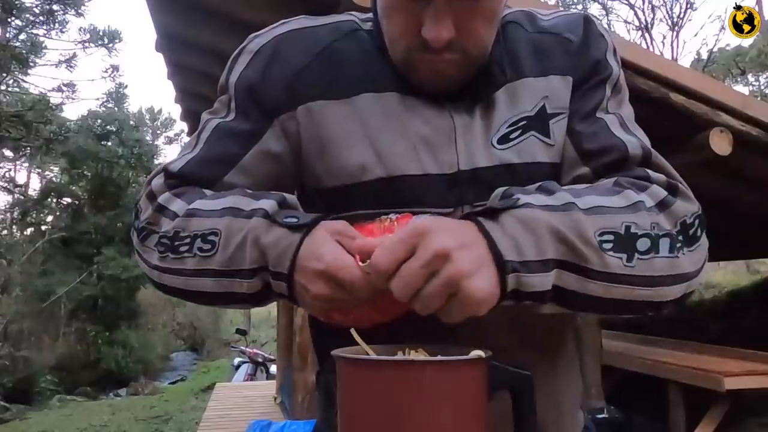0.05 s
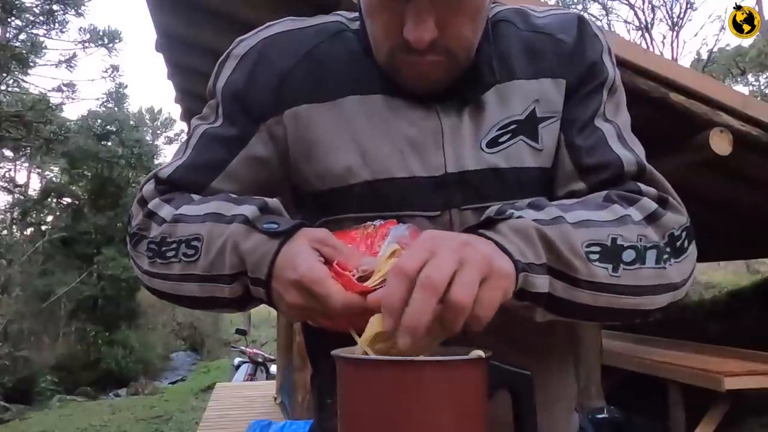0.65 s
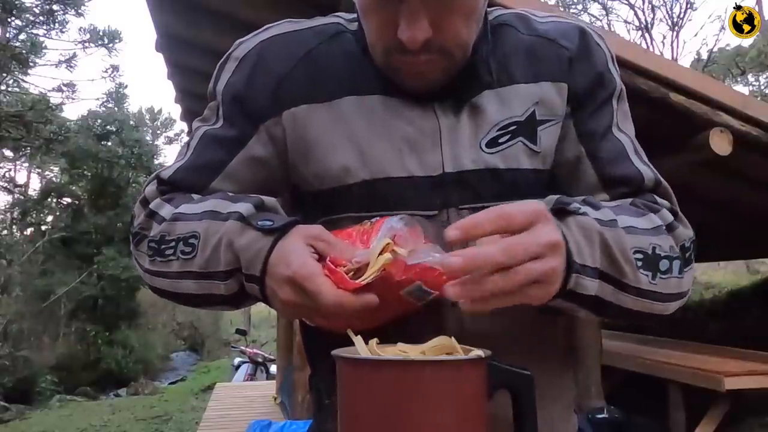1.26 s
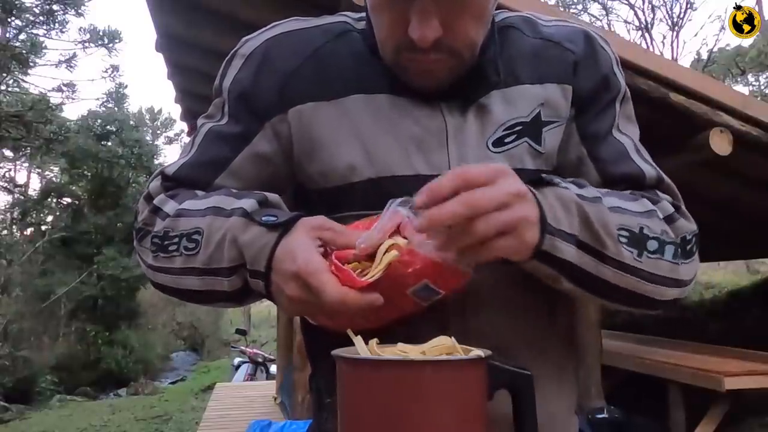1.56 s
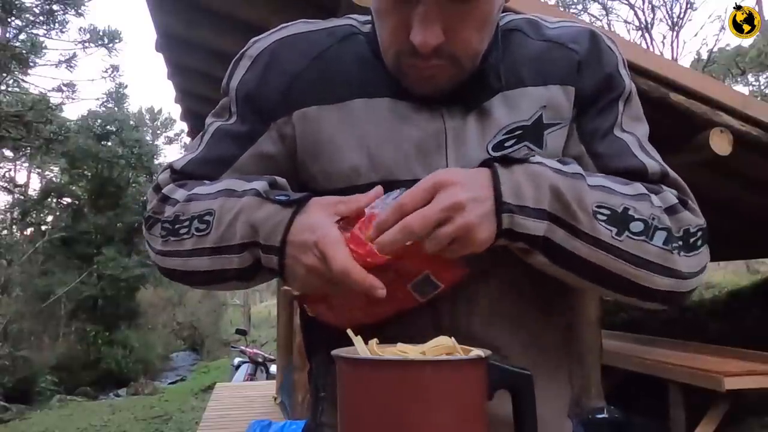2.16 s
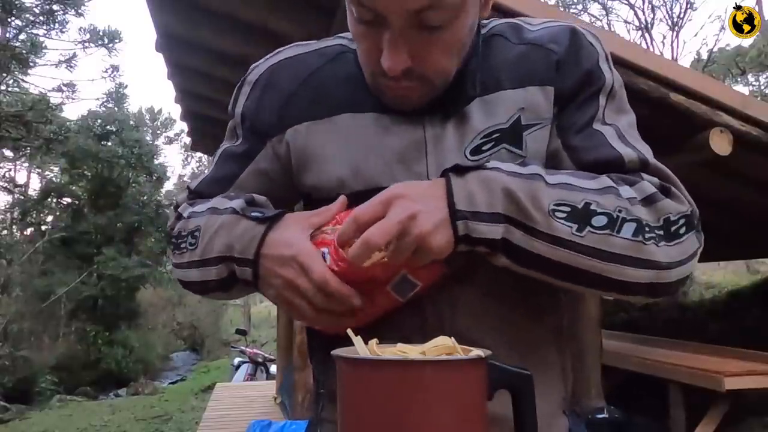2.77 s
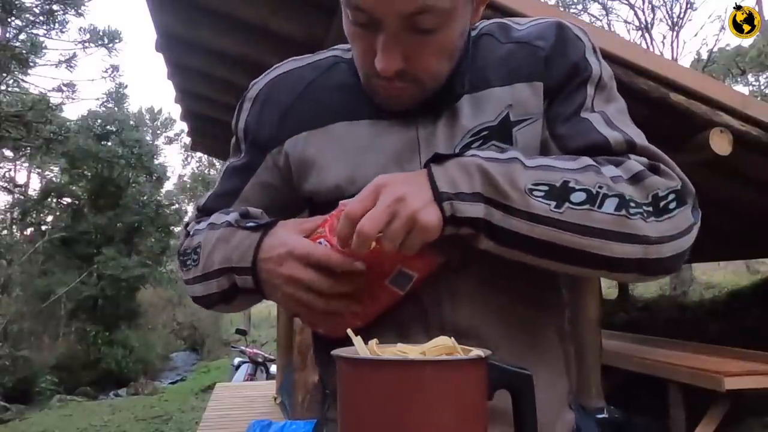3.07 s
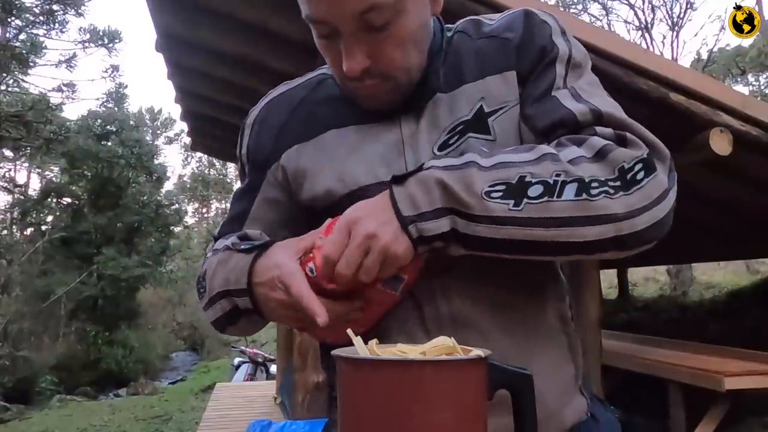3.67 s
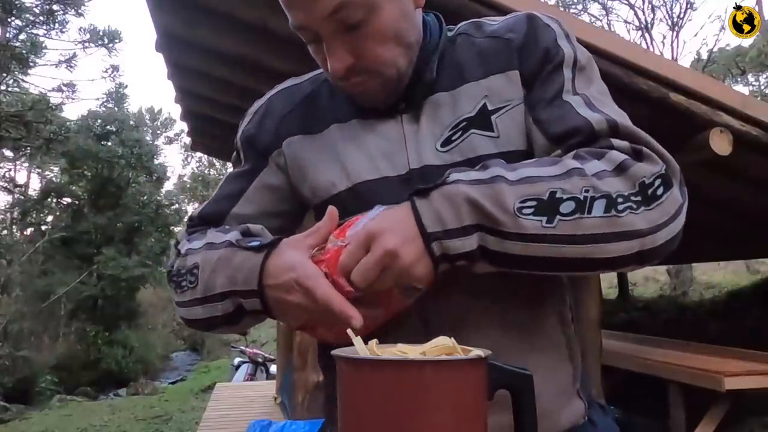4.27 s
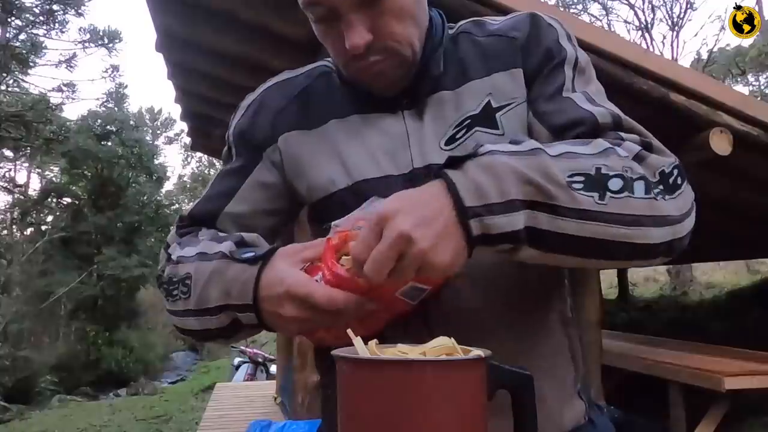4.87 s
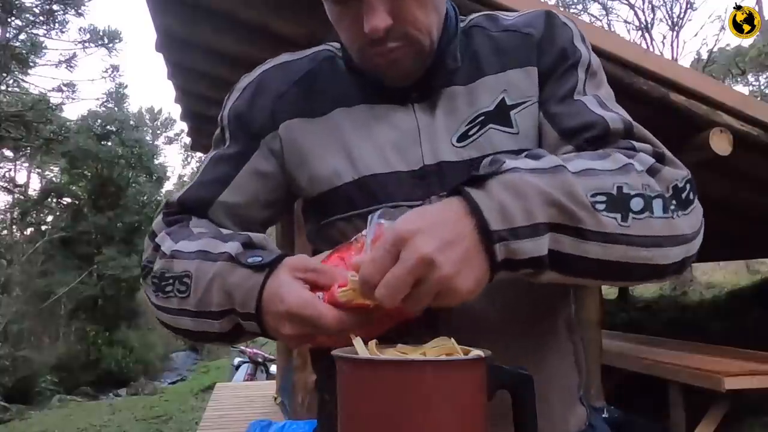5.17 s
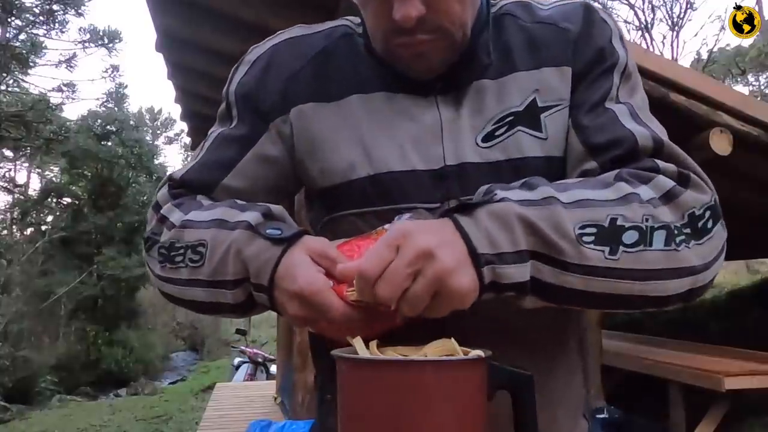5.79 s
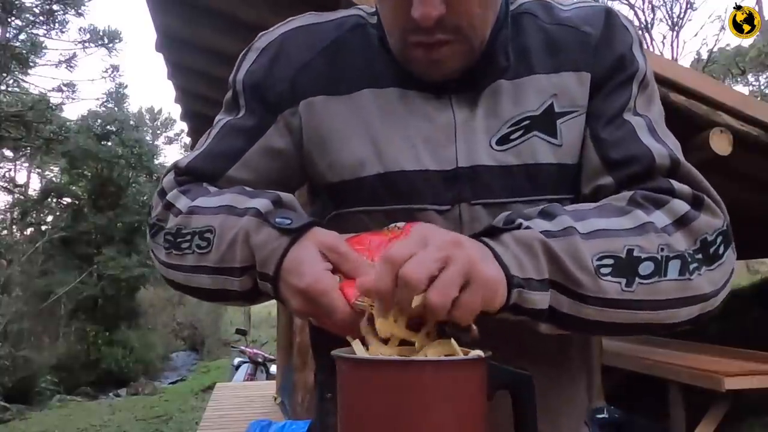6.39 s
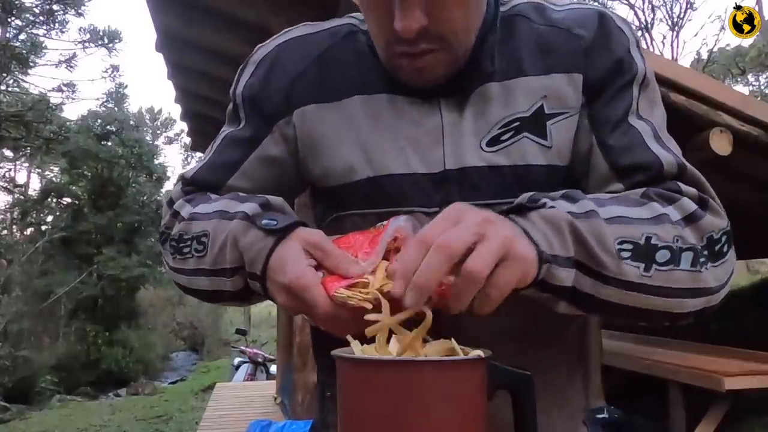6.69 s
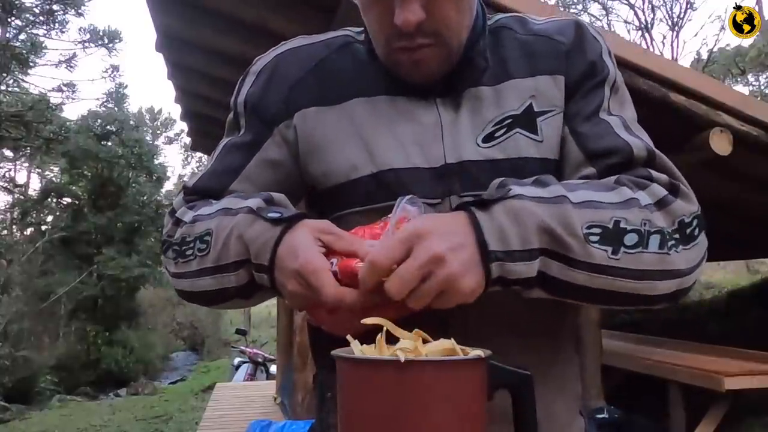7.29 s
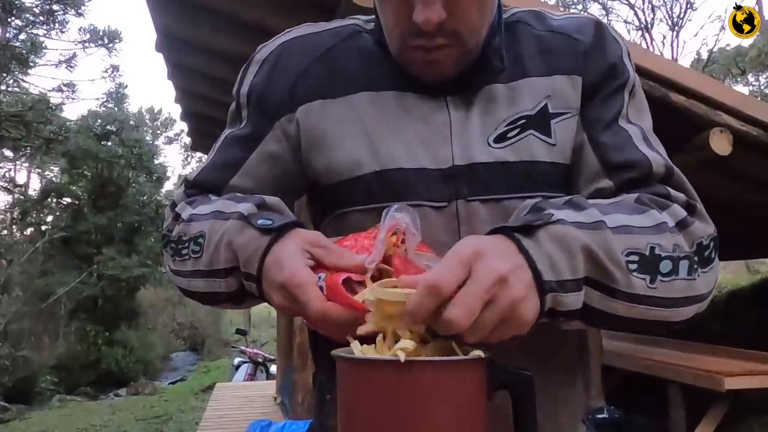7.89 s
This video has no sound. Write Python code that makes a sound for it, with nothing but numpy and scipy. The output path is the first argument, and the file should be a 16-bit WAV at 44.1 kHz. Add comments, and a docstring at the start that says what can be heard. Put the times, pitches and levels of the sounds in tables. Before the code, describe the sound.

A creek rushes steadily throughout, some way off and mostly to the left, in an open outdoor space. Close to a small stereo microphone, hands handle a thin plastic packet of dry ribbon noodles. Light crinkles and ticks come in the first half second, then thin out. From about 1.5 seconds the noodles scrape together, and from 2.2 to 5.4 seconds repeated grips make dense crinkling, grating and small dry cracks, with a few soft, dull bumps of the packet. Between about 5.8 and 6.3 seconds the noodles are broken over a pot in a quick run of sharp, brittle snaps, the loudest sounds. Only a few faint ticks follow until another short spell of crinkling and soft bumps from 7.5 to 7.8 seconds. Jacket sleeves stir a very faint low rumble now and then. The handling sounds dry and near, with almost no echo.

```python
"""Dry noodles, packet to pot

Outdoors, hands work dry ribbon noodles out of a thin plastic packet and snap them over a pot.
Right in front of a small stereo microphone the film crinkles and the noodles grate and crack with
each grip. Now and then the packet is bumped, and jacket sleeves stir a faint rumble.
A creek rushes steadily further off to the left."""
import sys
import numpy as np
from scipy import signal
from scipy.fft import rfft, irfft
from scipy.io import wavfile
from scipy.ndimage import uniform_filter1d, map_coordinates

SR = 44100
rng = np.random.default_rng(int(sys.argv[2]) if len(sys.argv) > 2 else 0)


def dump_mix(stems):
    """Bounce the given channels to the path in sys.argv[1] as a 16-bit WAV at rate SR."""
    frames = np.atleast_2d(stems).T  # one column per channel
    limited = np.clip(frames, -1, 1)  # hard clip at full scale
    pcm = np.round(limited * 32767).astype(np.int16)
    wavfile.write(sys.argv[1], SR, pcm)


N = 350154

# Hands squeeze the packet or dig into it: start_s, length_s, level_db, noodles_over_film_db
HAND_GRIPS = [(0.172, 0.11, -37, -21), (0.3, 0.028, -36.5, -20), (0.41, 0.032, -46, -15),
              (0.758, 0.054, -42, -13), (1.154, 0.058, -43, 3), (1.524, 0.2, -43, 8),
              (1.758, 0.21, -37, 15), (2.059, 0.022, -34, -6), (2.243, 0.174, -32, 0),
              (2.513, 0.18, -31.5, -1), (2.778, 0.2, -32, -2), (3.009, 0.13, -31.5, 2.5),
              (3.284, 0.29, -33.5, 3), (3.515, 0.21, -32, 2.5), (3.726, 0.23, -30.5, -4),
              (3.966, 0.041, -34, -4), (4.186, 0.042, -29.5, 4.5), (4.41, 0.062, -32.5, 3.5),
              (4.505, 0.1, -31, 0), (4.601, 0.25, -30.5, 4), (4.693, 0.11, -29.5, 6.5),
              (4.921, 0.13, -25.5, 1.5), (5.056, 0.17, -34, 0.5), (5.23, 0.097, -38, 4.5),
              (5.376, 0.03, -34, 3), (5.575, 0.059, -34, 9), (5.68, 0.09, -35, -8),
              (5.986, 0.033, -35.5, 7), (7.469, 0.24, -36.5, -3.5), (7.736, 0.074, -33, -4.5)]


def handling(held_db=-50, attack_s=0.036, sag_db_per_s=13, release_s=0.04, settle_db=-9, settle_s=0.23):
    """Each grip swells, sags and lets go, and the film settles. Gives crinkle and grating envelopes."""
    t = np.arange(N) / SR
    film = noodles = np.full(N, from_db(held_db) ** 2 / 2)
    for start_s, length_s, level_db, digging_db in HAND_GRIPS:
        held_s = np.clip(t - start_s, 0, length_s)
        let_go_s = np.clip(t - start_s - length_s, 0, 2)
        attack = np.clip((t - start_s) / attack_s, 0, 1)
        pressure = attack * from_db(level_db - sag_db_per_s * held_s)
        release = np.exp(-2 * let_go_s / release_s)
        settling = from_db(settle_db) ** 2 * np.exp(-2 * let_go_s / settle_s)
        power = pressure ** 2 * (release + settling)
        film_share = 1 / (1 + from_db(digging_db) ** 2)
        film = film + film_share * power
        noodles = noodles + (1 - film_share) * power
    unsteady_fingers = from_db(drift(22))
    return np.sqrt([film, noodles]) * unsteady_fingers


def crackle(spectrum, per_s, spread_db, clump_db, q, facets=14):
    """Tiny clicks come in clumps, each ringing facets of its own pitch. Stereo, level held near 1."""
    size_db = spread_db * np.minimum(rng.exponential(1, N), 3.5) + clump_db * drift(260)
    sizes = from_db(size_db) * rng.choice([-1, 1], N)
    fires = rng.random(N) < per_s / SR
    clicks = sizes * fires * (1 + 0.077 * rng.standard_normal((2, N)))   # slightly unlike in each ear
    facet = np.round(facets * drift(90) + 2 * rng.standard_normal(N)) % facets
    rings = sum(resonance(clicks * (facet == k), hz, q) / np.sqrt(hz / 3000)
                for k, hz in enumerate(np.geomspace(800, 11000, facets)))
    sound = coloured(rings + 0.38 * clicks, spectrum)
    power = np.mean(sound ** 2, axis=0)
    power = uniform_filter1d(uniform_filter1d(power, size=1500), size=1500)
    return sound / np.sqrt(np.abs(power) + 0.0071 * power.mean())


# Bright tone of the buckling film: frequency_hz, gain_db
FILM_EQ = [(100, -31), (300, 3), (650, -11), (1100, -3), (2200, 2), (4000, 1), (7000, -4.5), (11000, -9),
           (16000, -27)]
# Darker tone of noodles rubbing together: frequency_hz, gain_db
GRATING_EQ = [(80, -42), (250, -0.5), (380, -5), (520, -14), (800, -18.5), (1050, -3.5), (1280, -1.5),
              (1600, -5.5), (2200, -7), (3500, -9.5), (7000, -14.5), (16000, -28)]


def packet(crinkle, grating, film_lift_db=2.0):
    """The film buckles and the noodles scrape; harder handling makes both denser and louder."""
    grip = np.hypot(crinkle, grating)
    effort = np.sqrt(grip / grip.max())
    film = crackle(FILM_EQ, per_s=2300 * effort, spread_db=3.5, clump_db=6.0, q=2.8)
    noodles = crackle(GRATING_EQ, per_s=3200 * effort, spread_db=4.0, clump_db=4.5, q=3.7)
    return from_db(film_lift_db) * crinkle * film + grating * noodles


def fracture(centre_hz, rings, length_s, spectrum, tail_s, size=1024):
    """A break sets off a volley of smaller ones that excite rings (hz, db, q). Rms 1 over 5 ms."""
    t = np.arange(size) / SR
    noise, scatter = rng.standard_normal(size), rng.standard_normal((2, size))
    breaks = rms_one(np.sign(noise) * np.abs(noise) ** 1.4)   # spikier than plain noise
    first_break = 0.5 * np.exp(-t / 0.0003)
    volley = np.exp(-(t / (1.96 * max(length_s, 3e-4))) ** 3)
    tail = 0.5 * from_db(-13) * np.exp(-t / tail_s)
    force = evened(breaks * (volley + first_break + tail))
    force = force + scatter * (0.3 * volley + tail)   # scattered by pot and jacket
    crack = rms_one(coloured(resonance(force, centre_hz, q=0.62), spectrum, size=512))
    sound = crack + sum(from_db(db) * rms_one(resonance(crack, hz, q)) for hz, db, q in rings)
    return sound / np.sqrt(np.sum(sound ** 2) / (2 * 0.005 * SR))


def evened(burst, amount=0.6):
    """Smooth a burst's chance peaks and dips, so a crack takes its colour from the piece that breaks."""
    hz = np.fft.rfftfreq(len(burst), 1 / SR)
    power = uniform_filter1d(np.abs(rfft(burst)) ** 2, size=9)
    excess_db = 10 * np.log10(power / power.mean() + 0.1)
    return coloured(burst, np.transpose([hz, -amount * excess_db])[1:], size=256)


# Cracks that stand out of the crinkle: start_s, level_db (before lift), centre_hz, ring_hz, ring_db
ACCENT_CRACKS = [(0.1227, -26, 3700, 3120, 0), (0.1898, -29, 7000, 1130, -4),
                 (0.2238, -26, 7060, 7700, -7.5), (0.2572, -28.5, 4500, 2885, -3),
                 (0.289, -28.5, 3750, 2720, -5), (0.3293, -28.5, 6200, 2800, -11),
                 (0.3334, -28, 3700, 2920, -10), (0.3384, -26, 3640, 3270, -4),
                 (0.4403, -28.5, 2980, 1920, -18), (1.1969, -28.5, 3600, 3900, -6),
                 (1.537, -34, 2970, 3540, 2), (1.615, -29.5, 5540, 2740, -9),
                 (1.6994, -27.5, 3270, 2220, -8), (1.8018, -30, 1200, 4030, 4),
                 (1.824, -24.5, 1890, 4130, -2), (2.2294, -29.5, 3100, 7050, -12),
                 (2.2367, -21, 2660, 3410, -6), (2.3262, -19.5, 3760, 5780, -8),
                 (2.3955, -27, 1420, 3480, -8.5), (2.4115, -23, 4510, 3180, -5.5),
                 (2.5797, -25.5, 1900, 2920, -8), (2.591, -25, 4450, 3400, -15),
                 (2.6025, -20, 3000, 4050, -5.5), (2.6448, -19, 4500, 2180, -2),
                 (2.652, -23.5, 3700, 2700, -10), (2.6812, -22.5, 2370, 7400, -14),
                 (2.7332, -27.5, 4500, 1980, -14), (2.7584, -24, 3670, 3600, -4),
                 (2.8155, -27, 7060, 7000, 3), (2.8564, -24.5, 4480, 2030, -5),
                 (2.8645, -22, 3660, 4010, -1), (2.8927, -20.5, 7000, 6130, 7),
                 (2.9044, -26, 1900, 2940, 6), (2.9194, -24.5, 1200, 2130, -10),
                 (3.0195, -25.5, 2990, 3600, 0), (3.0339, -22.5, 1500, 2070, 0),
                 (3.052, -27, 3000, 3860, 4), (3.0607, -24, 7100, 5480, 16),
                 (3.1562, -24.0, 2360, 1380, -3), (3.3005, -19, 2830, 4680, 2),
                 (3.3239, -31, 2750, 1240, -2), (3.3345, -20, 1495, 2077, -6),
                 (3.4076, -26, 2630, 4140, -7), (3.4143, -19.5, 3680, 1245, -6),
                 (3.4622, -23, 3700, 2570, -1), (3.4769, -23, 3000, 1520, -5),
                 (3.4932, -25.5, 3000, 5300, -19), (3.5655, -21, 2630, 1335, -1),
                 (3.5703, -23.5, 4000, 5000, -10), (3.5745, -18.5, 3300, 1410, -8),
                 (3.5904, -18.5, 1800, 5600, 0), (3.604, -25, 2190, 1250, 9), (3.6256, -24, 1200, 2380, -3),
                 (3.6354, -21, 2400, 2630, -4.5), (3.694, -27.5, 2200, 2500, -7),
                 (3.8083, -23.5, 4470, 7480, -1), (3.8226, -27.5, 2500, 3400, 0.5),
                 (3.8524, -26, 4970, 3510, 2), (3.8598, -24.5, 3000, 3600, -4.5),
                 (3.8898, -27, 1800, 5070, -7), (3.9042, -28, 4500, 4800, -5),
                 (3.9239, -23, 3050, 1860, -2), (3.9841, -28, 7300, 4560, -10),
                 (3.9898, -28.5, 3700, 3600, -9), (4.0304, -26.5, 1880, 4150, -2),
                 (4.1724, -21.5, 3290, 1350, -8.5), (4.174, -25.5, 5500, 2000, 1.5),
                 (4.2233, -29, 1100, 2140, 1), (4.2356, -23, 5520, 1730, 4), (4.2526, -23, 5500, 5230, -5),
                 (4.3041, -24.5, 4500, 1080, -8), (4.423, -26.0, 1210, 2450, 9),
                 (4.4339, -23, 3020, 3830, -4.5), (4.4724, -23.5, 2390, 1316, -8),
                 (4.5675, -22, 2410, 4700, 0), (4.5867, -22.5, 1900, 1925, -10),
                 (4.7441, -22.5, 1495, 2210, -6), (4.7886, -22.5, 1923, 1934, -8),
                 (4.8638, -23.5, 1200, 8110, 4), (4.9203, -24.5, 1207, 2860, 3.5),
                 (4.971, -23, 1920, 1360, 7), (4.9984, -24, 1207, 1388, 8), (5.0701, -31, 3190, 3120, 5.5),
                 (5.1227, -20, 6770, 2800, -5), (5.3004, -21, 3700, 1324, -2.5),
                 (5.315, -22.5, 3000, 1100, -6), (5.3464, -26, 1510, 6430, -9),
                 (5.6009, -26.5, 1203, 1270, -6), (5.7098, -28.5, 1250, 3670, -11),
                 (5.7527, -25, 7000, 2990, -2), (5.7945, -26.5, 2360, 3120, -5),
                 (6.3831, -29.5, 5430, 6500, -5), (6.6287, -28.5, 3000, 5970, -2),
                 (6.6615, -31.5, 5530, 3270, -2), (6.993, -32, 4500, 3300, -5),
                 (7.4985, -31, 6500, 3780, -8), (7.5482, -28, 3520, 1850, 0.5),
                 (7.5593, -26, 5000, 1860, -8), (7.7218, -26, 3280, 980, -9.5),
                 (7.7243, -23, 3200, 3320, -2.5), (7.7875, -27, 1896, 2060, 3)]
# Tone of a crack inside the packet: frequency_hz, gain_db
CRACK_EQ = [(100, -34), (400, 0), (750, -6), (1150, 8), (1600, 1.5), (2200, 4), (3200, -0.5), (5500, 2),
            (9000, -3.5), (16000, -8)]


def cracks(rows, lift_db=0.0, usual_length_s=0.0012, ring_q=9.4):
    """Creases flip and noodles give way: dry ticks, each with a ping ring_db above its crack."""
    out = np.zeros((2, N))
    for start_s, level_db, centre_hz, ring_hz, ring_db in rows:
        length_s = usual_length_s * np.exp(0.31 * rng.standard_normal())
        crack = fracture(centre_hz, [(ring_hz, ring_db, ring_q)], length_s, CRACK_EQ, tail_s=0.0027)
        add(out, start_s, from_db(level_db + lift_db) * crack)
    return out


def lesser_ticks(crinkle, grating, peak_per_s=85, film_hz=4800, noodle_hz=1800, ring_db=-15, count=800):
    """Creases and noodles give way at random, more often and louder as the film is squeezed."""
    when, chance = rng.random((2, count))
    spread_db, detune = np.clip(rng.standard_normal((2, count)), -2, 2)
    at = (when * N).astype(int)
    grip = np.hypot(crinkle, grating)[at]
    film_share = (crinkle[at] / grip) ** 2
    centre_hz = noodle_hz * (film_hz / noodle_hz) ** film_share
    ring_hz = centre_hz * 2 ** (0.27 * detune)
    level_db = 20 * np.log10(grip) - 0.5 + spread_db
    rows = np.transpose([at / SR, level_db, centre_hz, ring_hz, np.full(count, ring_db)])
    odds = peak_per_s * N / SR / count * crinkle[at] / crinkle.max()
    return cracks(rows[chance < odds])


# Noodles snapped over the pot: start_s, level_db, centre_hz, ring_hz, ring_db, length_s
NOODLE_SNAPS = [(5.8443, -16.5, 1860, 2560, 4.5, 0.0012), (5.878, -23.5, 1150, 900, -7, 0.0011),
                (5.92, -24, 2350, 2660, 2, 0.0011), (5.9273, -14.5, 4170, 5330, -3, 0.0025),
                (5.977, -21.5, 4000, 7200, -13, 0.0023), (5.9933, -16, 4260, 4330, -3, 0.0034),
                (5.9995, -15, 5850, 2850, 4, 0.0043), (6.0432, -22, 4400, 1960, 7, 0.0011),
                (6.0481, -14.5, 4100, 2720, -7, 0.0013), (6.0602, -17.5, 4500, 5820, -16, .0022),
                (6.093, -14.5, 3400, 6350, -4, 0.0013), (6.117, -26, 2000, 4870, -3, 0.0016),
                (6.185, -26, 2380, 3300, -6, 0.0015), (6.199, -14, 4700, 3030, -17, 0.002),
                (6.241, -13.5, 3960, 3220, -22, 0.0021), (6.2806, -22, 2300, 2280, 12, 0.0012)]
# Bending modes of a broken ribbon: pitch_hz, level_db (against the crack)
BENDING_MODES = [(1300, -18), (2300, -15), (3080, -10), (4250, -18), (5500, -13), (7300, -15)]
# Tone of a snap in the open, brittle to the top of the treble: frequency_hz, gain_db
SNAP_EQ = [(100, -24), (400, 0), (750, 2), (1250, 9.5), (1650, 3), (2900, -2.5), (3600, -4), (5500, -2),
           (9000, 3), (16000, 3)]


def snaps(ring_q=5.8, mode_q=11, detune_octaves=0.05, splinter_hz=3600, splinter_ring_db=-15):
    """A dry ribbon breaks, rings in its bending modes and sheds three splinters."""
    out, splinters = np.zeros((2, N)), []
    for start_s, level_db, centre_hz, ring_hz, ring_db, length_s in NOODLE_SNAPS:
        rings = [(ring_hz, ring_db, ring_q)]
        masked_db = max(ring_db + 10, 0) / 2   # one strong ring masks the rest
        for mode_hz, mode_db in BENDING_MODES:
            detune = 2 ** (detune_octaves * rng.standard_normal())
            rings.append((mode_hz * detune, mode_db - masked_db, mode_q))
        snap = fracture(centre_hz, rings, length_s, SNAP_EQ, tail_s=1.5 * length_s)
        add(out, start_s, from_db(level_db) * snap)
        for delay, faintness, pitch in rng.random((3, 3)):
            splinter_db = level_db - 18 - 10 * faintness
            ping_hz = splinter_hz * 2 ** (2 * pitch - 1)
            splinters.append((start_s + 0.03 * delay, splinter_db, splinter_hz, ping_hz, splinter_ring_db))
    return out + cracks(splinters)


def close_by(sound, right_lead_s=3e-5, shelter_db=-25.0, shelter_t60_s=0.16, size=8192):
    """Direct sound reaches the right port first; a shelter roof returns a faint, thin tail."""
    late_left = map_coordinates(sound[0], [np.arange(N) - right_lead_s * SR], order=3)
    t = np.arange(size) / SR
    decay = from_db(-60 * t / shelter_t60_s) * (t > 0.005)
    shelter = rms_one(rng.standard_normal((2, size)) * decay) / np.sqrt(size)
    tail = resonance(signal.oaconvolve(sound, shelter, axes=1)[:, :N], hz=2500, q=0.63)
    return np.array([late_left, sound[1]]) + from_db(shelter_db) * tail


# Soft knocks of the hands on the packet: start_s, peak_db, pitch_hz
PACKET_BUMPS = [(2.327, -32, 171), (2.583, -32, 246), (3.026, -32, 255), (3.635, -29, 321),
                (4.514, -27.5, 246), (4.929, -33, 380), (5.312, -28.5, 343), (6.239, -31, 233),
                (7.49, -31.5, 231), (7.649, -27.5, 258)]


def bumps(q=1.78, swell_s=0.0035):
    """The filled packet gives a short, dull thud as its contents shift."""
    out, t = np.zeros(N), np.arange(SR // 10) / SR
    for start_s, peak_db, pitch_hz in PACKET_BUMPS:
        shove = rng.standard_normal(len(t)) * t * np.exp(-t / swell_s)
        thud = resonance(resonance(shove, pitch_hz, q), pitch_hz, q)
        add(out, start_s, from_db(peak_db) * thud / np.abs(thud).max())
    return out


# Tone of the rushing water: frequency_hz, gain_db
CREEK_EQ = [(25, -41), (50, -28), (100, -12.5), (160, -0.5), (290, -1.5), (450, -8.5), (680, -4.5),
            (850, -7), (1120, 1), (1500, -1.5), (2200, 0), (3700, -7), (5500, -8.5), (9000, -17),
            (16000, -40.5)]
# How alike the creek is in both ears: frequency_hz, correlation
CREEK_CORRELATION = [(150, 1.0), (290, .97), (640, 0.78), (1400, 0.72), (3100, 0.44), (6000, 0),
                     (15000, -0.7)]
# Where the creek leans: frequency_hz, left_over_right_db
CREEK_PAN = [(100, 1.5), (380, 1), (700, 3.5), (1300, 5.5), (2400, 9.5), (4400, 6), (6000, -0.5),
             (8000, 12), (15000, -2)]


def creek(level_db=-33.5, surge_db=1.52, bands=20):
    """Rushing water: noise bands that each surge a little, mostly to the left, wider in the treble."""
    out, edges_hz = 0, np.geomspace(22, 17500, bands + 1)
    white, ears = rng.standard_normal((2, 2, N)), np.array([[1], [-1]])
    for k, (low_hz, high_hz) in enumerate(zip(edges_hz, edges_hz[1:])):
        band = signal.butter(2, [low_hz, high_hz], "band", fs=SR, output="sos")
        mid, side = signal.sosfilt(band, white[k % 2])
        centre_hz = np.sqrt(low_hz * high_hz)
        alike = np.clip(at_hz(CREEK_CORRELATION, centre_hz), -1, 1)
        surge = from_db(surge_db * drift(45))
        pan = from_db(ears * at_hz(CREEK_PAN, centre_hz) / 2)
        out = out + surge * pan * (np.sqrt(1 + alike) * mid + np.sqrt(1 - alike) * side * ears)
    return from_db(level_db) * rms_one(coloured(out, CREEK_EQ))


# Jacket sleeves sweep past the microphone: peak_s, level_db
SLEEVE_SWEEPS = [(.15, -53.5), (2.35, -64), (2.95, -48.5), (4.85, -49.5), (6.252, -49)]
# Tone of the stirred air: frequency_hz, gain_db
SLEEVE_EQ = [(30, -27), (65, -9), (110, 1), (180, 9), (400, -16), (1000, -23)]


def sleeves(swing_s=0.34, rest_db=-58):
    """Heavy cloth stirs the air as the arms swing: a faint low rumble."""
    t = np.arange(N) / SR
    swings = sum(from_db(db) / (1 + ((t - peak_s) / swing_s) ** 2) ** 2 for peak_s, db in SLEEVE_SWEEPS)
    rumble = rms_one(coloured(rng.standard_normal(N), SLEEVE_EQ, size=4096))
    return (from_db(rest_db) + swings) * rumble


def from_db(db):
    """Decibels to gain."""
    return 10 ** (np.asarray(db) / 20)


def rms_one(x):
    """Scale to rms 1."""
    return x / np.sqrt(np.mean(x ** 2) + 1e-20)


def at_hz(points, hz):
    """Read a table on a log-frequency axis."""
    table_hz, values = np.transpose(points)
    return np.interp(np.log(hz + 1e-9), np.log(table_hz), values)


def drift(per_s):
    """A random wander with spread 1, turning about per_s times a second."""
    knots = rng.standard_normal(4096)
    return np.interp(np.arange(N) / SR * per_s, np.arange(len(knots)), knots) / np.sqrt(2 / 3)


def coloured(x, spectrum, size=2048):
    """Minimum-phase EQ: shapes the tone with no ringing ahead of an attack."""
    gain = from_db(at_hz(spectrum, np.fft.rfftfreq(size, 1 / SR)))
    cepstrum = irfft(np.log(gain))
    cepstrum[1:size // 2] *= 2
    cepstrum[size // 2 + 1:] = 0
    response = np.array(irfft(np.exp(rfft(cepstrum))), ndmin=x.ndim)
    return signal.oaconvolve(x, response, axes=-1)[..., :x.shape[-1]]


def resonance(x, hz, q):
    """One band-pass resonance, gain 1 at its peak."""
    angle = 2 * np.pi * min(hz, 0.4 * SR) / SR
    width = np.sin(angle) / (2 * q)
    return signal.lfilter([width, 0, -width], [1 + width, -2 * np.cos(angle), 1 - width], x + 1e-18)


def add(out, start_s, sound):
    """Mix a short sound in at start_s."""
    start = max(int(start_s * SR), 0)
    part = sound[..., :max(N - start, 0)]
    out[..., start:start + part.shape[-1]] += part


def scene():
    """Close handwork in front of the creek."""
    crinkle, grating = handling()
    bed = creek() + bumps() + sleeves()
    hands = packet(crinkle, grating) + snaps() + cracks(ACCENT_CRACKS, lift_db=1.0)
    return bed + close_by(hands + lesser_ticks(crinkle, grating))


def limiter(x, threshold_db=-7.5, release_db_per_s=50.0, linger_share=0.067, linger_db_per_s=0.06):
    """The loudest snaps duck the gain; most of it returns quickly, a small share creeps back."""
    t = np.arange(N) / SR
    over_db = np.maximum(20 * np.log10(np.abs(x).max(axis=0) + 1e-9) - threshold_db, 0)
    fast_db = np.maximum.accumulate(over_db + release_db_per_s * t) - release_db_per_s * t
    slow_db = np.maximum.accumulate(linger_share * over_db + linger_db_per_s * t) - linger_db_per_s * t
    duck_db = signal.lfilter([0.01], [1, -0.99], np.maximum(fast_db, slow_db))
    return x * from_db(-duck_db)


# Tone of the two microphone ports: frequency_hz, gain_db
LEFT_PORT_EQ = [(3000, 0), (5500, 0), (6500, -3.5), (7300, -9.5), (8100, -21), (9300, -14), (12300, -15.5),
                (16000, -25.5)]
RIGHT_PORT_EQ = [(3000, 0.5), (5500, -0.5), (6200, -1.5), (7100, 5.5), (7650, 3), (8050, -6.5),
                 (10500, -12.5), (12500, -7.5), (16000, -33.5)]


def record(dry, cutoff_hz=16400):
    """Each port colours its side, then come a limiter and a steep top cut."""
    ports = np.array([coloured(dry[0], LEFT_PORT_EQ), coloured(dry[1], RIGHT_PORT_EQ)])
    top_cut = signal.ellip(10, 0.1, 80, cutoff_hz, fs=SR, output="sos")
    return signal.sosfilt(top_cut, limiter(ports))


dry = scene()
out = record(dry)
dump_mix(out)
```